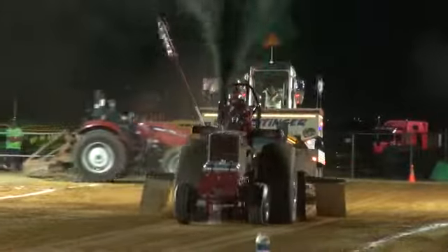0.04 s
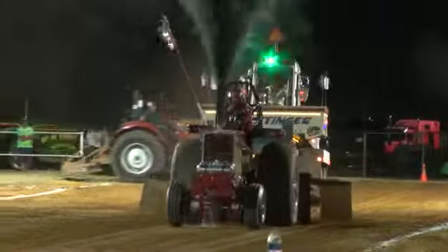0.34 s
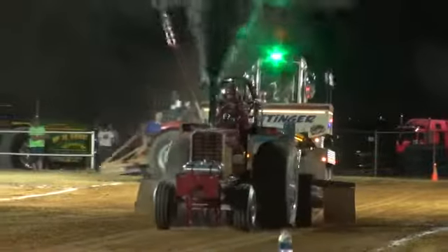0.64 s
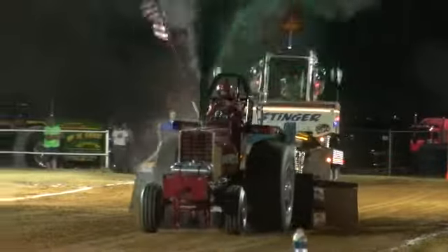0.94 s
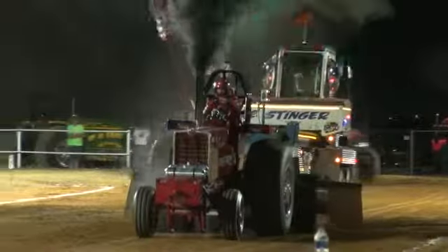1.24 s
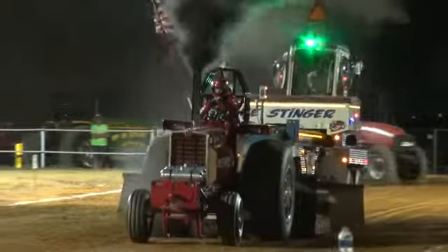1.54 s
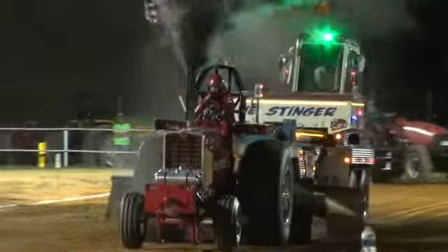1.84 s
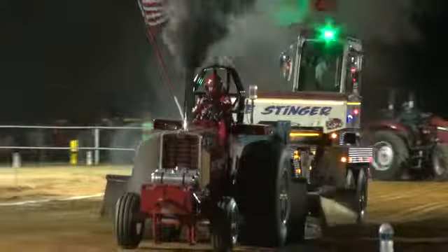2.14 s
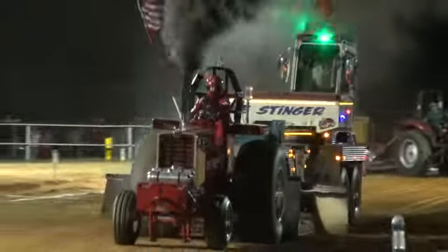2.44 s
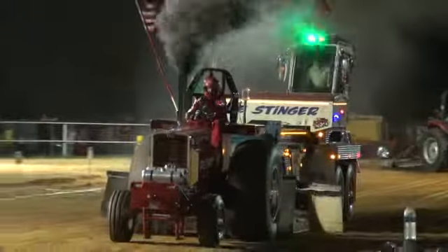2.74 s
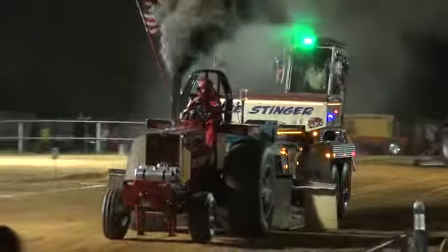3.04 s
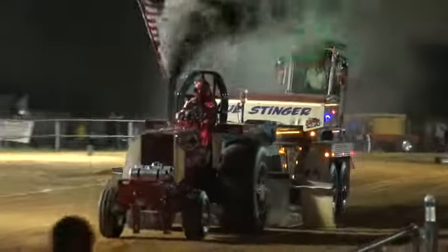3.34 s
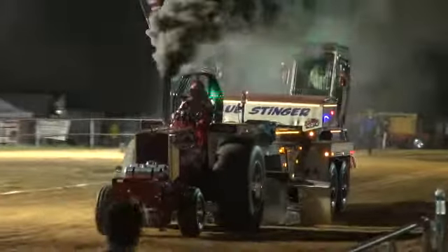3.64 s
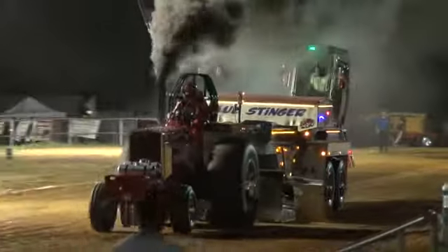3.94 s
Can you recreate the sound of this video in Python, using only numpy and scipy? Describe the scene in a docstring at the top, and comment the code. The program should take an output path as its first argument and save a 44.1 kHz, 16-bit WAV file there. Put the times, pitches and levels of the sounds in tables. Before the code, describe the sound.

A diesel pulling tractor roars at full throttle, its turbo whistle sliding steadily down.

```python
"""Diesel tractor pulling a sled

On open ground, a turbocharged tractor nears the microphone at full throttle, just off centre.
The load pulls the engine down: the firing drone sags and the turbo's whistle slides down with it.
Exhaust gas roars through the fixed resonances of the stack, with a rush that follows the turbo."""
import sys
import numpy as np
from scipy import signal
from scipy.fft import rfft, irfft
from scipy.io import wavfile

SR = 44100
rng = np.random.default_rng(int(sys.argv[2]) if len(sys.argv) > 2 else 0)


def to_wav(s):
    """Save 16-bit WAV."""
    ch = np.atleast_2d(s).T  # columns
    pcm = np.round(np.clip(ch, -1, 1) * 32767)  # PCM
    wavfile.write(sys.argv[1], SR, pcm.astype(np.int16))


N = 176400
TIME = np.arange(N) / SR


def amp(db):
    """Decibels to gain."""
    return 10 ** (np.asarray(db) / 20)


def unit(x):
    """Scales to rms 1."""
    return x / np.sqrt(np.mean(x ** 2) + 1e-20)


def curve(table, t=TIME, column=1):
    """One column of a table, joined by straight lines in time."""
    columns = np.transpose(table)
    return np.interp(t, columns[0], columns[column])


def colour(table, hz):
    """A spectrum, joined by straight lines on a log frequency axis."""
    points_hz, db = np.transpose(table)
    return np.interp(np.log(hz + 1e-6), np.log(points_hz), db)


def wander(rate_hz):
    """Smooth random motion of rms 1, up to about the given rate."""
    hz = np.fft.rfftfreq(N, 1 / SR)
    return unit(irfft(rfft(rng.standard_normal(N)) * np.exp(-(hz / rate_hz) ** 2), N))


def phase(hz):
    """Running phase of a frequency curve."""
    return 2 * np.pi * np.cumsum(hz) / SR


def body_echoes(x, count=14, span_s=0.025, total_db=-11.5):
    """Adds weak, early reflections from sled and tractor body, which ripple the spectrum."""
    arrival, polarity = rng.random((2, count))
    taps = np.zeros(int(span_s * SR) + 2)
    taps[1 + (arrival * span_s * SR).astype(int)] = amp(total_db) * np.sign(polarity - 0.5)
    return x + signal.oaconvolve(x, taps / np.sqrt(count))[:N]


# Lag of the ground reflection at the microphone, growing as the tractor nears: (time [s], delay [ms])
GROUND_LAG = [(0,.335),(.5,0.36),(1,.39),(1.5,0.43),(2.3,0.442),(3,0.43),(4,0.53)]
# Strength of that reflection at the start: (frequency [Hz], gain [dB])
GROUND_BOUNCE = [(500,-16.5),(1500,-14.5),(2600,-11.5),(4000,-3.5),(6000,-12.5),(12000,-34)]


def ground_comb(hz, t, fade_db_per_s=1.3):
    """Gain of a comb filter: the bounce off the ground interferes with the direct sound."""
    lag_s = curve(GROUND_LAG, t) / 1000
    bounce = amp(colour(GROUND_BOUNCE, hz) - fade_db_per_s * t)
    return abs(1 + bounce * np.exp(-2j * np.pi * hz * lag_s))


# The turbo slowing down: (time [s], blade tone [Hz], relative whistle level [dB])
TURBO = [(0,10900,-32),(.25,10510,-26),(.45,9990,-37),(.68,9430,-30),(1,8570,-32),(1.25,7900,-43),(1.42,7490,-37),(1.65,7025,-33),(1.78,6840,-36),(1.9,6680,-32),(2.27,6075,-24),(2.35,5960,-34),(2.5,5770,-29),(2.8,5390,-41),(3.08,5050,-39),(3.22,4895,-26),(3.4,4700,-34),(3.6,4485,-31),(4,4085,-28)]


def turbo_whistle(gain_db=0.5, octave_db=-27, flutter_hz=44.64):
    """The turbo's blade tone and its octave, fluttering in the hot air."""
    blades = phase(curve(TURBO) * (1 + 0.00138 * wander(flutter_hz)))
    flutter = unit(1 + 0.39 * wander(flutter_hz))
    level = amp(gain_db + curve(TURBO, column=2)) * flutter
    return np.sqrt(2) * level * (np.cos(blades) + amp(octave_db) * np.cos(2 * blades))


# Swells of noise: (pitch [x blade tone], width [Hz], peak time [s], spread [s], level [dB])
SQUEAL_BANDS = [(1.0,300,0.17,0.17,-24),(1.0,1800,0.13,0.19,-28),(.92,860,0.66,0.37,-23),(1.02,1800,0.71,0.49,-24.5),(.92,450,1.3,0.1,-31),(2.03,600,2.52,.17,-39)]


def turbo_squeal():
    """At high boost the whistle smears into breathy bands that slide with it."""
    out = np.zeros(N)
    for multiple, width_hz, peak_s, spread_s, db in SQUEAL_BANDS:
        carrier = phase(multiple * curve(TURBO))
        band = wander(width_hz / 2) * np.cos(carrier) + wander(width_hz / 2) * np.sin(carrier)
        swell = np.exp(-0.5 * ((TIME - peak_s) / spread_s) ** 2)
        out += amp(db) * swell * band
    return out


# Fixed resonances of the stack: (frequency [Hz], gain [dB])
STACK_COLOUR = [(15, -9.0), (43, -2.6), (80, 7.7), (130, 5.3), (185, 10.7), (290, 5.2), (350, -3.8),
                (420, 0.1), (500, -5.8), (550, 2.5), (680, 0.1), (780, -2.0), (930, -7.1), (1060, -2.0),
                (1230, -2.0), (1330, -5.1), (1480, -3.7), (1640, 1.4), (1800, 0.7), (1960, -1.6),
                (2130, -4.3), (2520, -1.4), (2800, -4.7), (3040, -2.0), (3630, -6.0), (3930, -0.8),
                (4480, -7.4), (4850, -4.0), (5180, -10.6), (5660, -5.9), (6600, -5.1), (7900, -8.8),
                (9500, -9.1), (11700, -10.9), (13500, -15.9)]
# The rush that slides with the turbo: (frequency [x blade tone], gain [dB])
RUSH_COLOUR = [(0.3, 4.5), (0.55, 5.5), (0.8, 9), (1, 3.7), (1.15, 2.3), (1.5, -0.6), (1.75, -1.5), (2, -2),
               (2.3, -7.5), (3, -11.5)]
# Centres of the roar's bands: (bass [Hz], low mids [Hz], rasp [Hz], treble [Hz])
ROAR_BANDS = (250, 700, 2600, 9000)
# Their balance at the microphone: (time [s], bass [dB], low mids [dB], rasp [dB], treble [dB])
ROAR_BALANCE = [(0, -9, 5, -1.5, -1), (0.5, -6.5, 3, 0.4, 1.5), (1.1, -3.5, 3, 3.5, -0.3),
                (1.5, -2.5, 4, 1.7, -0.7), (2.1, -1.5, 5.5, 1, 3.5), (2.6, -3.5, 4.9, -0.9, 2.5),
                (3.2, -4, 5, -1.5, 2.1), (3.6, -1, 7, -1.5, 2.6), (4, -1, 7.5, -2, 4)]
# Hollows in the roar while the tractor is far: (centre [Hz], width [Hz], gain [dB], fade time [s])
FAR_HOLLOWS = [(990,150,-7.5,0.64),(4260,1200,-2.5,0.51)]


def exhaust_roar(firing, level_db=-16.5, puff_depth=0.043, flicker_db=0.72):
    """Turbulent gas, coloured by stack, turbo and ground, puffing a little at each firing."""
    frames = dict(fs=SR, nperseg=2048, noverlap=1536)
    hz, t, noise = signal.stft(rng.standard_normal(N), **frames)
    hz = hz[:, None]
    db = colour(STACK_COLOUR, hz) + colour(RUSH_COLOUR, hz / curve(TURBO, t))
    for band, selector in enumerate(np.eye(len(ROAR_BANDS))):
        share = colour(np.c_[ROAR_BANDS, selector], hz)  # neighbouring bands crossfade
        db += share * curve(ROAR_BALANCE, t, column=band + 1)
    for centre_hz, width_hz, depth_db, fade_s in FAR_HOLLOWS:
        db += depth_db * np.exp(-((hz - centre_hz) / width_hz) ** 2 - (t / fade_s) ** 2)
    gas = signal.istft(noise * amp(db) * ground_comb(hz, t), **frames)[1][:N]
    gas = body_echoes(gas)
    puffs = 1 + puff_depth * np.cos(firing)
    flicker = amp(flicker_db * wander(rate_hz=55))
    return amp(level_db) * unit(gas * puffs * flicker)


# The engine sagging under load: (time [s], firing rate [Hz])
FIRING_RATE = [(0.0, 163.8), (0.12, 160.8), (0.28, 151.7), (0.5, 146.5), (1.01, 130.8), (1.18, 130.3),
               (1.5, 126.5), (1.75, 126.4), (2.17, 119.8), (2.52, 115.0), (2.68, 112.4), (2.74, 112.7),
               (2.97, 108.7), (3.48, 99.8), (3.52, 98.8), (4.0, 91.3)]


def firing_phase(jitter=0.0041):
    """One turn for each cylinder firing, at a slightly unsteady engine speed."""
    return phase(curve(FIRING_RATE) * (1 + jitter * wander(rate_hz=19)))


# Body of the drone: (time [s], firing tone level [dB], octave level [dB])
DRONE_LEVELS = [(0,-16,-32),(.22,-15.5,-31),(.48,-17.5,-22),(.62,-18.5,-23),(.76,-17.5,-20),(1,-16.7,-23.5),(1.42,-16.3,-24.5),(1.6,-14,-23.5),(1.93,-16,-19.5),(2.1,-15.5,-25.5),(2.28,-21.5,-31.5),(2.5,-18,-29),(2.65,-14.5,-29),(2.97,-14.5,-26),(3.24,-18,-23),(3.45,-16.5,-21),(3.7,-17.5,-20.5),(3.85,-19,-26),(4,-17.5,-18.5)]
# Lope of uneven cylinders, at 1.5 times the firing rate: (time [s], level [dB])
LOPE_LEVEL = [(0,-42),(1.2,-46),(1.9,-43),(2.15,-28.5),(2.5,-26),(2.7,-48),(4,-33)]
# Engine orders over a cycle of six firings: (order [x cycle rate], base level [dB])
ENGINE_ORDERS = [(4,-42.5),(18,-36),(20,-42),(22,-58),(24,-37),(26,-37),(30,-34.5),(36,-48)]
# Resonances that lift each order sliding through them: (centre [Hz], half width [Hz], lift [dB])
PIPE_RESONANCES = [(574,12.6,8),(670,37,5.5),(427,19,4.5)]


def engine_drone(firing, order_fade_db_per_s=2.5, order_waver=0.29):
    """Six cylinders fire into the stack: rounded pressure pulses, slightly uneven."""
    out = amp(curve(DRONE_LEVELS)) * np.cos(firing)
    out += amp(curve(DRONE_LEVELS, column=2)) * np.cos(2 * firing)
    out += amp(curve(LOPE_LEVEL)) * np.cos(1.5 * firing)
    for order, db in ENGINE_ORDERS:
        multiple = order / 6
        hz = multiple * curve(FIRING_RATE)
        lift_db = sum(peak_db / (1 + ((hz - centre_hz) / half_width_hz) ** 2)
                      for centre_hz, half_width_hz, peak_db in PIPE_RESONANCES)
        level = amp(db + lift_db - order_fade_db_per_s * TIME)
        waver = 1 + order_waver * wander(rate_hz=5)
        out += level * waver * np.cos(multiple * firing)
    return -np.sqrt(2) * out


# Diffuse sound reaching the microphone from the sides: (frequency [Hz], gain [dB])
DIFFUSE_COLOUR = [(40,-20),(150,-22),(600,-19),(1400,-20.5),(3000,-18.5),(9500,-13),(11500,-21),(12500,-34)]
# Stereo balance at the microphone: (frequency [Hz], left minus right [dB])
STEREO_LEAN = [(60,-3.5),(130,-2.5),(280,-1.8),(620,-1.8),(1340,-1.2),(2920,-2.2),(6000,-0.9),(10000,-0.7),(12500,-0.5)]


def scene():
    """The tractor ahead, a little louder on the right, with faint diffuse roar from the sides."""
    hz = np.fft.rfftfreq(N, 1 / SR)
    firing = firing_phase()
    direct = rfft(engine_drone(firing) + exhaust_roar(firing) + turbo_whistle() + turbo_squeal())
    diffuse = amp(colour(DIFFUSE_COLOUR, hz)) * rfft(exhaust_roar(firing) + turbo_squeal())
    stereo = np.array([direct + diffuse, direct - diffuse])
    lean_db = colour(STEREO_LEAN, hz) / 2
    return irfft(stereo * amp([lean_db, -lean_db]), N)


def record(dry):
    """The microphone's band limit cuts the highest treble."""
    lowpass = signal.firwin(511, cutoff=14100, window=("kaiser", 9), fs=SR)
    return signal.oaconvolve(dry, lowpass[None], "same")


dry = scene()
out = record(dry)
to_wav(out)
```